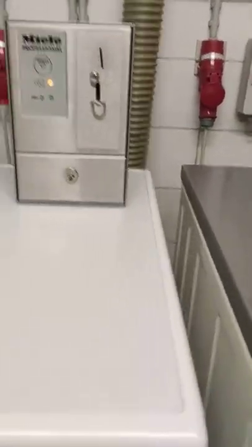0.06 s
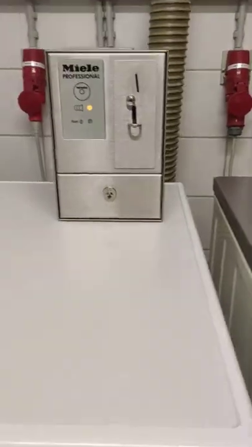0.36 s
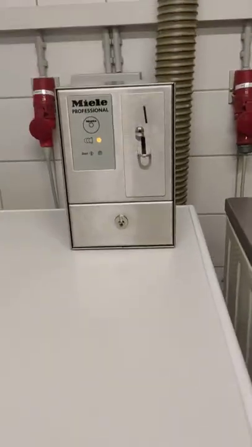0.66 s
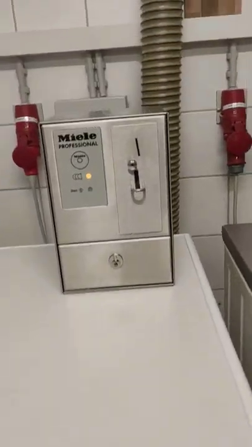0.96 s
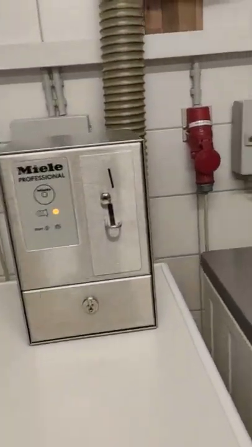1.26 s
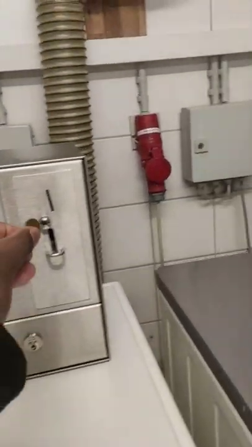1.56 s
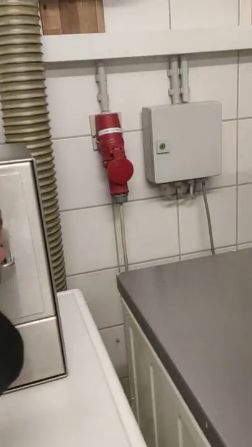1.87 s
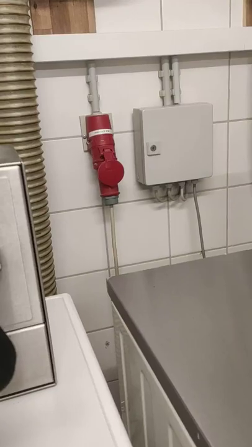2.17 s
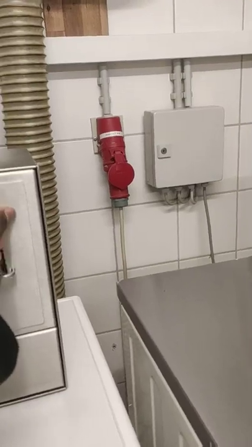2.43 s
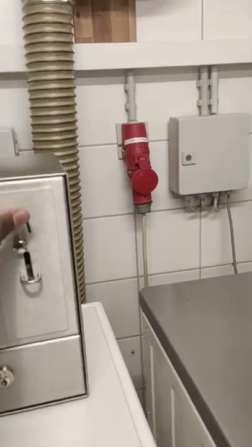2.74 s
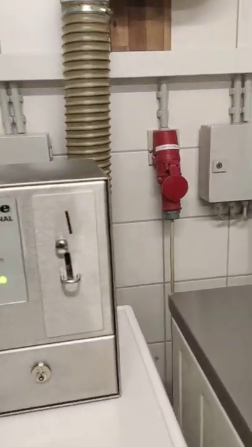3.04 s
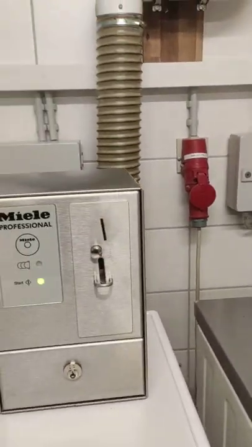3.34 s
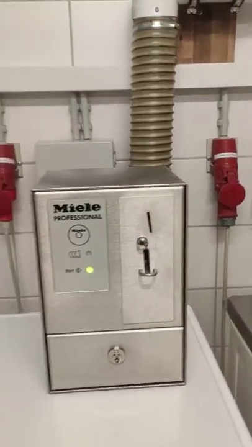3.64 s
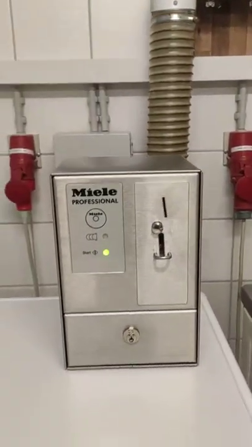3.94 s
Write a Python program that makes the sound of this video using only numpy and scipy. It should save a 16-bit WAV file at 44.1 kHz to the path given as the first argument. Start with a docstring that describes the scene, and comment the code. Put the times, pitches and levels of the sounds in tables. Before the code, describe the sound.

A coin ticks into a slot, rolls down and clunks into a steel box.

```python
"""In a quiet tiled laundry room, a coin is fed into a steel coin meter.
Over low rumble and hiss, a sleeve swishes as cloth rubs on cloth. The coin ticks against the
slot, rolls and rattles down the chute and pushes past a flap. Then it drops into the cash box
with a loud clunk, bounces and rings. Struck steel gives a noisy clatter and a few clear,
fading tones (its modes), and the tiles add a short echo."""
import sys
import numpy as np
from scipy import signal
from scipy.fft import rfft, irfft
from scipy.io import wavfile

SR = 44100
rng = np.random.default_rng(int(sys.argv[2]) if len(sys.argv) > 2 else 0)


def unload_audio(sound):
    """Save the sound as a 16-bit wav file, at the path given as the first command line argument."""
    columns = np.transpose(np.atleast_2d(sound))
    # keep every value between -1 and 1, then stretch to whole-number steps
    steps = np.round(np.clip(columns, -1, 1) * 32767)
    wavfile.write(sys.argv[1], SR, steps.astype(np.int16))


N = 176400
TIME = np.arange(N) / SR
ATTACK_S = 0.00081  # how fast struck metal starts to sound


def from_db(db):
    """Turn decibels into a volume multiplier."""
    return 10 ** (np.asarray(db) / 20)


def rms_one(x):
    """Scale a sound to an average power of 1."""
    return x / np.sqrt(np.mean(x ** 2) + 1e-20)


def at_hz(points, hz):
    """Read between the rows of a (pitch, value) table, on a musical pitch scale."""
    pitches, values = np.transpose(points)
    return np.interp(np.log(np.maximum(hz, 1)), np.log(pitches), values)


def bins(size):
    """The pitches in the spectrum of a sound this many samples long."""
    return np.fft.rfftfreq(size, 1 / SR)


def add(out, start_s, sound):
    """Mix a sound in at its start time."""
    i = int(start_s * SR)
    out[:, i:i + sound.shape[1]] += sound[:, :N - i]


def pan(left_db):
    """Left and right volumes; above 0 the left is louder."""
    return from_db([[left_db / 2], [-left_db / 2]])


def uneven(size, step):
    """A random wobble: straight lines between values drawn every step points."""
    return np.interp(np.arange(size) / max(step, 4), np.arange(size), rng.standard_normal(size))


# how alike the two ears hear a sound: pitch_hz, likeness (1 = the same, 0 = unrelated)
EAR_LIKENESS = [(60, 0.64), (150, 0.99), (300, 0.91), (600, 0.45), (1000, -0.087), (2200, -0.076),
                (4500, -0.0084), (16000, 0.078)]

def noise(colour_db, size):
    """Stereo noise, alike in the bass; its colour says how strong each pitch is next to the rest."""
    mid, side = rfft(rng.standard_normal((2, size)))
    alike = np.clip(at_hz(EAR_LIKENESS, bins(size)), -.99, .99)
    ears = np.sqrt(1 + alike) * mid + np.sqrt(1 - alike) * side * [[1], [-1]]
    return irfft(ears * from_db(colour_db), size) / np.sqrt(2 * np.mean(from_db(2 * colour_db)))


def clatter(colour_db, fade_s, rattle_db):
    """Struck sheet steel: crowded tones blur into a sharp crack and an uneven after-rattle."""
    t, hz = TIME[:SR // 2], bins(SR // 2)
    cluster_hz, contact_hz, grain_s, rattle_fade_s = 108.5, 700, 0.00308, 0.2
    clusters_db = 5.5 * uneven(len(hz), step=cluster_hz * t[-1])
    contact_db = 2.5 * uneven(len(hz), step=contact_hz * t[-1])  # each spot hit sounds different
    bumps_db = 4.5 * uneven(len(t), step=grain_s * SR)
    crowding = at_hz([(900, 0.2), (2000, 0.85)], hz)
    steel = noise(colour_db + crowding * (clusters_db + contact_db), len(t))
    crack = from_db(-60 * t / fade_s)  # a fade time is the time to drop by 60 dB
    rattle = from_db(rattle_db + bumps_db - 60 * t / rattle_fade_s)
    return steel * (crack + rattle) * (1 - np.exp(-t / ATTACK_S))


def ring(tones, detune=0, spread_db=4, steady_below_hz=1260):
    """Struck metal rings with clear, fading tones; the high ones vary most from hit to hit."""
    hz, db, fade_s = np.transpose(tones)[:, :, None]
    t = TIME[:SR // 2]
    strength, phase, side, shift = rng.standard_normal((4, len(tones), 1))
    hz = hz * (1 + detune * shift)
    loose = hz / (hz + steady_below_hz)
    fade = from_db(db + spread_db * strength * loose - 60 * t / fade_s) * (1 - np.exp(-t / ATTACK_S))
    angle = 2 * np.pi * hz * t + 2 * loose * phase
    ear_offset = np.arccos(np.clip(at_hz(EAR_LIKENESS, hz), -1, 1)) / 2 * np.sign(side)
    return np.array([(fade * np.sin(angle + ear * ear_offset)).sum(0) for ear in (1, -1)])


# how long the room echoes: pitch_hz, fade_s
ECHO_FADES = [(100, 0.94), (300, 1), (1000, 0.88), (3000, 0.76), (6000, 0.47), (10000, 0.38), (15000, 0.32)]

def room(dry, echo_db, build_s=0.0028):
    """Add the tiled room: a smooth echo whose treble dies first."""
    t, centres = TIME[:SR], np.geomspace(60, 16000, num=12)
    white = rfft(noise(0 * bins(SR), SR))
    tail = 0
    for hz, pick in zip(centres, np.eye(len(centres))):
        band = irfft(white * at_hz(np.c_[centres, pick], bins(SR)), SR)
        tail = tail + band * from_db(-60 * t / at_hz(ECHO_FADES, hz))
    tail = rms_one(tail * (1 - np.exp(-t / build_s))) / np.sqrt(SR)
    return dry + from_db(echo_db) * signal.fftconvolve(dry, tail, axes=1)[:, :N]


# colour of the room air and microphone hiss: pitch_hz, strength_db
AIR_COLOUR = [(25, -3.5), (50, -9.5), (110, -18.5), (180, -13), (265, -13.5), (350, -23), (550, -20.5),
              (1100, -31), (6000, -28), (7500, -36), (12000, -29.5), (16000, -39)]

def air(level_db=-56.5, sway_db=1.15):
    """Low room rumble and hiss, swaying slightly."""
    sway = np.interp(TIME, np.linspace(0, N / SR, num=24), rng.standard_normal(24))
    return from_db(level_db - sway_db * sway) * noise(at_hz(AIR_COLOUR, bins(N)), N)


# rumble of the hand holding the microphone: time_s, level_db
HAND_LEVELS = [(0, -52), (.2, -46.5), (.4, -59.5), (1.8, -66), (2.35, -55.5), (2.52, -52), (2.65, -70),
               (4, -64)]
# colour of that rumble: pitch_hz, strength_db
HAND_COLOUR = [(25, -1.5), (60, -19), (130, -19), (400, -24.5), (1500, -37), (16000, -62)]

def hand_rumble():
    """A soft rumble as the microphone is moved."""
    level_db = np.interp(TIME, *np.transpose(HAND_LEVELS))
    return from_db(level_db) * noise(at_hz(HAND_COLOUR, bins(N)), N)


def blip(start_s=2.5155, length_s=0.0051, from_hz=1000, to_hz=430, level_db=-45):
    """A tiny falling chirp."""
    progress = np.clip((TIME - start_s) / length_s, 0, 1)
    hz = from_hz * (to_hz / from_hz) ** progress
    return from_db(level_db) * np.sin(np.pi * progress) * np.sin(2 * np.pi * np.cumsum(hz) / SR)


# thin scuffs in the rustle: start_s, length_s, pitch_hz, rise_hz, width_hz, level_db
THIN_SCUFFS = [(0.03, .34, 10940, 1099, 900, -60.5), (0.875, 0.031, 1676, 0, 1000, -61),
               (0.979, .13, 1880, 249, 250, -65.5)]

def scuffs():
    """Brief, narrow bands of hiss; the longer ones slide upwards."""
    out = np.zeros((2, N))
    for start_s, length_s, pitch_hz, rise_hz, width_hz, level_db in THIN_SCUFFS:
        progress = np.clip(TIME[:SR] / length_s, 0, 1)
        flutter = noise(-20 * np.log10(1 + (2 * bins(SR) / width_hz) ** 2), SR)
        tone = np.sin(2 * np.pi * np.cumsum(pitch_hz + rise_hz * progress) / SR)
        add(out, start_s, from_db(level_db) * np.sin(np.pi * progress) * flutter * tone)
    return out


# swishes of the sleeve as the arm moves: start_s, rise_s, hold_s, level_db, treble_db
SWISHES = [(0.018, 0.029, 0.31, -57.5, 6.5), (0.458, 0.029, 0.28, -60, 8.5), (0.753, .02, .015, -58, 4),
           (0.882, 0.013, .15, -57, 4), (0.99, 0.0099, 0.037, -55.5, 6), (1.236, 0.0073, 0.56, -54, -2.5),
           (1.604, 0.04, 0.033, -41.5, 3.5), (1.661, 0.038, .04, -52.5, -2),
           (1.761, 0.048, .16, -58.5, -4.5), (3.851, 0.041, 0.13, -52.5, 0)]
# colour of rubbing cloth: pitch_hz, strength_db
CLOTH_COLOUR = [(200, -10), (800, -10.5), (1300, -5.5), (2000, -5.5), (3200, -1), (4800, -4), (6100, 0.5),
                (7600, -8.5), (11500, -5.5), (16000, -16)]

def sleeve(fall_db_per_s=188, grain_s=0.0083):
    """Cloth slides on cloth: each swish swells, rubs unevenly and dies away."""
    out, hz, t = np.zeros((2, N)), bins(SR), TIME[:SR]
    treble = at_hz([(4000, 0.065), (11000, 0.94)], hz)
    for start_s, rise_s, hold_s, level_db, treble_db in SWISHES:
        grip_db = 1.03 * uneven(SR, step=grain_s * SR)
        fall_db = fall_db_per_s * np.maximum(t - rise_s - hold_s, 0)
        swell = np.minimum(t / rise_s, 1) * from_db(level_db + grip_db - fall_db)
        add(out, start_s, swell * noise(at_hz(CLOTH_COLOUR, hz) + treble_db * treble, SR))
    return out


# taps at the slot: start_s, clatter_db, sheen_db (near 8 kHz), treble_db, ring_db, left_db
SLOT_TAPS = [(2.0996, -32, 5.5, -3, -35.5, -3.5), (2.2150, -26, -6, 11.5, -31, -3),
             (2.2268, -32, -5, -1, -54, 6), (2.327, -53, -10, -13.5, -61, -6),
             (2.4063, -47.5, -4, -9, -46, -6), (2.551, -37, -3, -19, -56, -1.5)]
# tones of the front plate: pitch_hz, level_db, fade_s
PLATE_TONES = [(3084, -9.5, 0.063), (3820, -0.5, 0.05), (4026, 0, 0.05), (4480, -7, 0.1),
               (5910, -14, 0.087), (9600, -2, 0.048), (10370, 3, 0.029)]
# colour of the plate's clatter: pitch_hz, strength_db
PLATE_COLOUR = [(200, -10.5), (900, -13.5), (2200, -12), (3800, -1), (6400, 2.5), (8200, -6), (10300, -1),
                (13500, -3.5), (16000, -17.5)]

def slot_taps():
    """The coin's edge ticks on the front plate while it finds the slot."""
    out, hz = np.zeros((2, N)), bins(SR // 2)
    treble = at_hz([(10500, 0.213), (13000, 0.85)], hz)
    sheen = at_hz([(6400, 0), (7500, 1), (9200, 1), (11000, 0.21)], hz)
    for start_s, clatter_db, sheen_db, treble_db, ring_db, left_db in SLOT_TAPS:
        colour_db = at_hz(PLATE_COLOUR, hz) + sheen_db * sheen + treble_db * treble
        tick = from_db(clatter_db) * clatter(colour_db, fade_s=0.049, rattle_db=-10)
        add(out, start_s, (tick + from_db(ring_db) * ring(PLATE_TONES)) * pan(left_db))
    return room(out, echo_db=-6.5)


# tones of the flap: pitch_hz, level_db, fade_s
FLAP_TONES = [(414, -1.5, 0.33), (536, 2, 0.57), (615, -5, 0.14), (1350, -10.5, .15)]

def flap(start_s=3.134, gain_db=-42.5):
    """The coin pushes past a flap near the end of the chute and leaves it ringing."""
    out = np.zeros((2, N))
    add(out, start_s, from_db(gain_db) * ring(FLAP_TONES))
    return out


# tones of the coin: pitch_hz, level_db, fade_s, held_change_db
COIN_TONES = [(8270, -18, 0.18, 1.5), (13400, -7, 0.18, -9), (13453, -23, .11, -3), (13957, -10, 0.16, -1),
              (13980, -5, 0.15, 0)]

def coin_ring(held):
    """The coin's bright ring; its tones change strength while the chute's walls hold it."""
    return ring([(hz, db + held * change_db, fade_s) for hz, db, fade_s, change_db in COIN_TONES])


# tones of the chute: pitch_hz, level_db, fade_s
CHUTE_TONES = [(1262, -18.5, 0.22), (1750, -25, .15), (3910, -16, 0.33), (4700, -20, 0.14),
               (5800, -7, 0.07), (6100, -8, 0.092), (8480, -9, 0.15), (10780, -11, 0.11),
               (12030, -13, 0.15), (12550, -20, .15), (14850, -15.5, .18)]

def chute_ring():
    """The chute rings, its pitches shifted a little by where it is hit."""
    return ring(CHUTE_TONES, detune=.015)


# the coin rolling down the chute: time_s, level_db
ROLL_LEVELS = [(2.2, -74), (2.3, -60.5), (2.5, -70.5), (2.66, -44), (2.81, -85), (2.92, -47.5),
               (3.08, -49.5), (3.16, -46), (3.28, -90)]
# low hums of the meter's casing: pitch_hz, strength_db, width_hz
CASING_HUMS = [(251, -3, 24), (302, 0.5, 24)]
# colour of the chute's steel, rolled on or knocked: pitch_hz, strength_db
CHUTE_STEEL_COLOUR = [(100, -3.5), (300, 2), (800, -6), (1300, -1), (2200, -2.5), (3800, -2), (6000, 2),
                      (7600, -4.5), (10300, 1.5), (13500, -4.5), (16000, -13)]

def coin_roll(bumps_per_s=350, bump_s=0.0029):
    """The coin's ridged rim chatters along the chute, makes it tinkle and sets the casing humming."""
    level_db = np.interp(TIME, *np.transpose(ROLL_LEVELS), left=-200, right=-200)
    hz = bins(N)
    bumps = (rng.random(N) < bumps_per_s / SR) * rng.exponential(1, N)
    fading_bumps = rms_one(signal.lfilter([1], [1, -np.exp(-1 / (bump_s * SR))], bumps))
    chatter = fading_bumps * noise(at_hz(CHUTE_STEEL_COLOUR, hz), N)
    tinkle = rms_one(signal.fftconvolve(bumps[None], chute_ring(), axes=1)[:, :N])
    casing = sum(from_db(db) / (1 + (2 * (hz - pitch) / width) ** 2) for pitch, db, width in CASING_HUMS)
    hum = from_db(-39.5 + 0.32 * level_db) * noise(20 * np.log10(casing), N)  # gently follows the roll
    return from_db(level_db) * (chatter + from_db(-9) * tinkle) + hum


# knocks in the chute: start_s, chute_db, bass_db, coin_db, left_db
CHUTE_KNOCKS = [(2.5992, -28, -11, -52, -6), (2.608, -35, -3.5, -21, -2.5), (2.6219, -31, 4.5, -41, 2),
                (2.648, -40, -5, -33, -4), (2.7416, -36.5, -3.5, -62, -2), (2.779, -45, 0, -69, -1),
                (2.8272, -35, -6, -48.5, 0), (2.892, -36.5, -1, -55, -5), (2.9135, -37, -4, -55, 2.5),
                (2.96, -44, -7, -59, -5.5), (2.9909, -35, 0, -56, -1.5), (3.053, -42, -7, -44, 1),
                (3.0950, -24.5, -11.5, -34, -3.5), (3.104, -34, -4, -27, -8.5), (3.118, -32, -16, -50, 3.5),
                (3.1332, -30.5, 4, -42, -1), (3.179, -40, 1.5, -66, 3)]

def coin_in_chute():
    """Rolling down to the flap and past it, the coin knocks against the chute, and both ring."""
    chute, coin = np.zeros((2, 2, N))
    hz = bins(SR // 2)
    bass = at_hz([(1500, 0.75), (3500, 0.017)], hz)
    for start_s, chute_db, bass_db, coin_db, left_db in CHUTE_KNOCKS:
        steel = clatter(at_hz(CHUTE_STEEL_COLOUR, hz) + bass_db * bass, fade_s=0.047, rattle_db=-9.5)
        knock = steel + from_db(-3.5) * chute_ring()
        add(chute, start_s, from_db(chute_db) * knock * pan(left_db))
        add(coin, start_s, from_db(coin_db) * coin_ring(held=True) * pan(left_db))
    return flap() + room(chute + coin_roll(), echo_db=-5) + room(coin, echo_db=-16)


# the landing and bounces in the cash box: start_s, clatter_db, panel_db, coin_db
BOUNCES = [(3.2659, -14.5, -11.5, -34), (3.2688, -18, -19.5, -33), (3.2959, -29.5, -31, -18),
           (3.332, -24, -30.5, -18), (3.36, -23.5, -25.5, -34), (3.3620, -20.5, -19, -38),
           (3.379, -23.5, -28, -26), (3.388, -23.5, -40, -21), (3.422, -41, -34.5, -50)]
# tones of the box's panels: pitch_hz, level_db, fade_s
PANEL_TONES = [(70, -26.5, 0.165), (189, -29.5, 0.25), (282, -11.5, 0.052), (304.9, -23, 0.56),
               (376, -10.5, 0.035), (588, -25, 0.4), (797, -24, 0.83), (974, -7, 0.081), (1015, 7, 0.034),
               (1000, -15, 0.35), (1066, -21, 0.22), (1188, -18, 0.3), (1203, -20, 0.47), (1384, -6, .035),
               (1454, -24, 0.26), (2220, -37, 0.52), (3524, -2, 0.03), (7600, -5, 0.025)]
# colour of the box's clatter: pitch_hz, strength_db
BOX_STEEL_COLOUR = [(60, -7.5), (140, -7), (330, -5), (650, -0.5), (1000, 2), (1700, 2.5), (3200, 3),
                    (4600, -0.5), (8000, 2), (11500, -2), (14000, 3), (16000, -22)]

def coin_drop():
    """The coin hits the cash box, whose panels clang, and bounces with a bright ring."""
    steel, panels, coin = np.zeros((3, 2, N))
    colour_db = at_hz(BOX_STEEL_COLOUR, bins(SR // 2))
    for start_s, clatter_db, panel_db, coin_db in BOUNCES:
        add(steel, start_s, from_db(clatter_db) * clatter(colour_db, fade_s=0.036, rattle_db=-8))
        add(panels, start_s, from_db(panel_db) * ring(PANEL_TONES))
        add(coin, start_s, from_db(coin_db) * coin_ring(held=False))
    return room(steel, echo_db=-3.5) + room(panels, echo_db=-9.5) + room(coin, echo_db=-16)


def scene():
    """The coin's way through the meter, with the small sounds around it."""
    coin = slot_taps() + coin_in_chute() + coin_drop()
    background = sleeve() + scuffs() + blip() + hand_rumble() + air()
    return background + coin


# how much louder the left microphone is than the right: pitch_hz, left_db
MIC_BALANCE = [(60, 1.5), (380, 2), (700, 2), (1200, -1), (2400, 1.5), (4400, 3.5), (8100, -3), (13000, 2)]

def record(dry, cutoff_hz=16600):
    """Each microphone has its own colour; peaks are clipped and the highest treble is cut."""
    gains = from_db(at_hz(MIC_BALANCE, bins(N)) * np.array([[.5], [-.5]]))
    coloured = irfft(rfft(dry) * gains, N)
    treble_cut = signal.cheby2(16, 60, cutoff_hz, fs=SR, output="sos")
    return signal.sosfilt(treble_cut, np.clip(coloured, -1, 1))


dry = scene()
out = record(dry)
unload_audio(out)
```